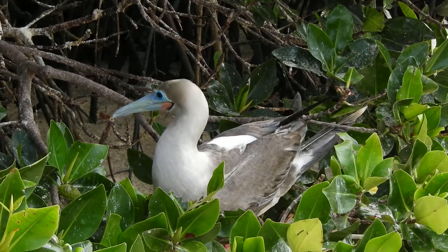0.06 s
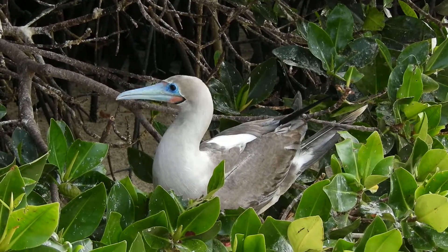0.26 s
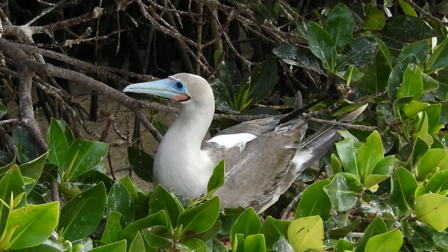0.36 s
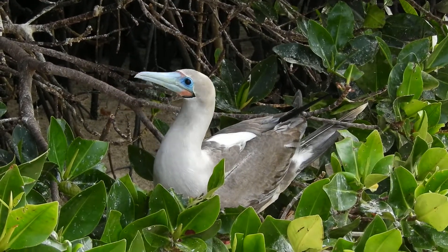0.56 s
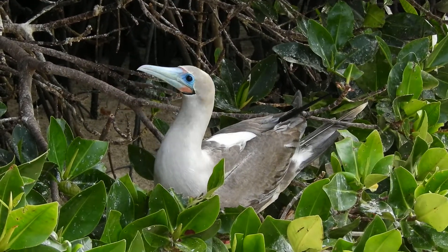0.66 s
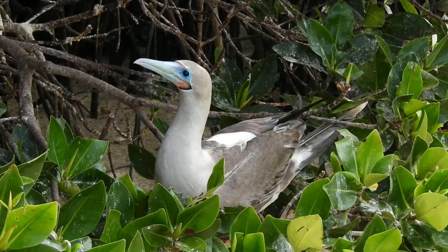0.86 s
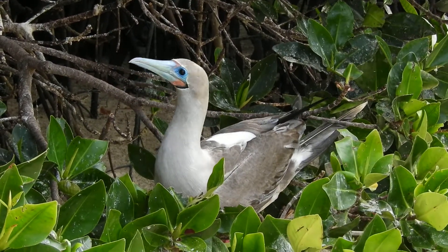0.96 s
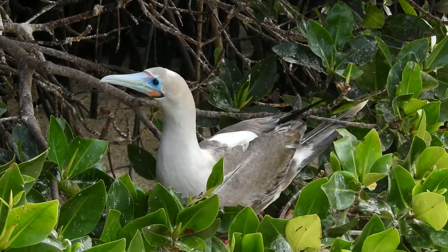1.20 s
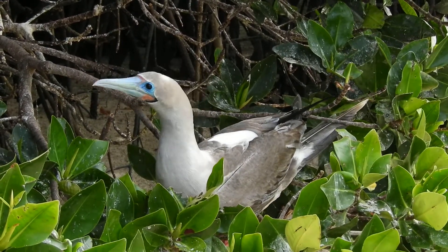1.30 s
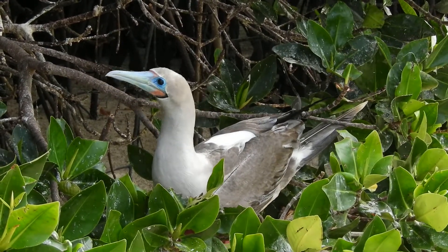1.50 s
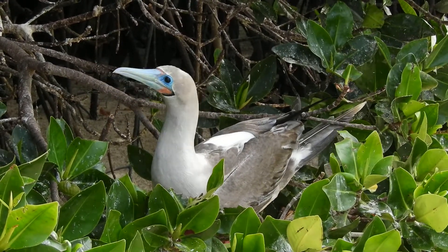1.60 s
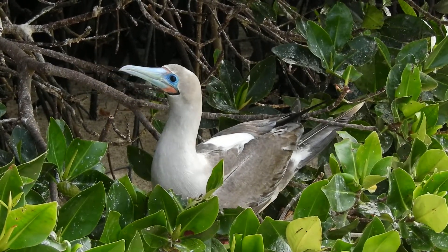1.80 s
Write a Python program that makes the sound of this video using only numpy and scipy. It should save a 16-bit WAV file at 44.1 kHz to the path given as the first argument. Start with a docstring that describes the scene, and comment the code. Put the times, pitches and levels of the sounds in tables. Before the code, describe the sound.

A seabird gives one harsh honk over wind rumble and camera shutter clicks.

```python
"""A soft rush of leaves and distant shore lies under a lumpy wind rumble from the start.
Small mechanical clacks and clicks, like camera shutters, sound nearby throughout. Wind thumps the right
microphone port around a faint far call; the hardest thump ducks the recorder's gain, which creeps back.
At 1.37 s a booby on its nest in the bushes gives one harsh honk from syrinx and throat: a rasping start,
a clearer arched note, a rough end. A second far call slips in among the last clacks."""
import sys
import numpy as np
from scipy import signal
from scipy.fft import rfft, irfft, next_fast_len
from scipy.io import wavfile
from scipy.ndimage import uniform_filter1d, map_coordinates

SR = 44100
rng = np.random.default_rng(int(sys.argv[2]) if len(sys.argv) > 2 else 0)


def output_pcm(signal):
    """Save a mono or channel-first signal as 16-bit PCM at the path in sys.argv[1].

    Samples are clipped to [-1, 1] before scaling.
    """
    pcm = np.clip(np.atleast_2d(signal).T, -1, 1) * 32767
    wavfile.write(sys.argv[1], SR, np.round(pcm).astype(np.int16))


N = 81585

# swells of the wind rumble: t/s, level/dB
RUMBLE_LEVEL = [(0, -26), (.11, -42), (.16, -28), (.28, -33.5), (.4, -24.5), (.52, -29), (.62, -33.5),
                (.76, -42.5), (.86, -39.5), (.94, -43.5), (1.02, -29), (1.17, -49), (1.28, -33),
                (1.35, -43), (1.45, -39.5), (1.6, -41.5), (1.85, -44)]
# tone of the rumble: f/Hz, level/dB
RUMBLE_COLOUR = [(15, 2), (35, -5.5), (70, 4), (110, -3.5), (170, -9), (250, -27), (400, -30.5),
                 (1000, -61)]
# wind thumps on the right port: t/s, half length/s, f/Hz, peak level/dB
THUMPS = [(.208, 0.01, 135, -10), (.252, 0.02, 120, -23.5), (.288, 0.014, 157, -13.5),
          (.313, 0.017, 120, -14.5), (.3425, 0.0096, 143.4, -4.5), (0.3608, 0.0082, 152, 1.5),
          (.933, 0.0051, 165, -19), (1.281, 0.0035, 95, -19.5), (1.309, 0.0032, 123, -13),
          (1.432, 0.015, 72.4, -26)]
# faders of the background bed: t/s, shore level/dB, leaves level/dB
RUSH_LEVEL = [(0, -45.5, -54.5), (.17, -45, -54), (.26, -38.5, -51), (.35, -42.5, -51), (.45, -41, -52),
              (.66, -45.5, -53), (.9, -43.5, -52.5), (1.06, -45.5, -53), (1.16, -43.5, -49.5),
              (1.35, -42.5, -55), (1.7, -44, -51), (1.81, -39, -52.5), (1.85, -42, -50)]
# dark wash of the shore: f/Hz, level/dB
SHORE_COLOUR = [(120, 9.5), (280, 1), (480, -5.5), (650, -6.5), (900, 0.5), (1100, -3.5), (1320, -1.5),
                (1600, -10), (2200, -13.5), (3200, -35.5), (8000, -89)]
# airy hiss of the leaves: f/Hz, level/dB
LEAVES_COLOUR = [(800, -39), (2000, -2), (3200, -2.5), (4400, 0.5), (5800, -2), (8000, -5.5),
                 (10000, -10.5), (12000, -16), (15500, -21)]

# cues of the dull clacks: t/s, level/dB
CLACKS = [(.047, -41), (.382, -33.5), (.7495, -27.5), (.841, -38.5), (1.111, -29.5), (1.473, -26.5),
          (1.844, -30)]
# hollow ring of a clack: f/Hz, level/dB, t60/s
CLACK_MODES = [(425, -8, .05), (570, -5, .045), (705, -1, .05), (830, -1, .045), (965, 0, .055),
               (1600, -13, .04), (2400, -19, .05)]
# rattle of a clack: f/Hz, level/dB
RATTLE_COLOUR = [(200, 1), (420, -2), (600, 0), (920, 8), (1200, -17), (1600, 2), (2000, -12), (2600, -8),
                 (4100, -13), (5200, -42.5), (8000, -21.5), (13000, -39)]
# short scrape after each clack: f/Hz, level/dB
SCRAPE_COLOUR = [(2500, -33), (3500, -12), (3850, -6), (4300, 3), (4700, -17), (6000, -28), (12000, -45)]
# cues of the two-part clicks: t/s, click level/dB, closing tick level/dB
CLICKS = [(0.213, -31.5, -35.5), (0.5017, -27, -32.5), (0.9298, -30.5, -35), (1.775, -44, -36.5)]
# body of a click: f/Hz, level/dB
CLICK_COLOUR = [(200, 8), (450, -6), (620, -1), (850, -4.5), (1080, 12), (1350, -31), (1830, 9),
                (2200, -15.5), (2750, 3), (3350, -6.5), (4000, -12), (5000, -40), (12000, -51)]
# its bright closing tick: f/Hz, level/dB
TICK_COLOUR = [(2500, -37.5), (3500, 4), (4200, 4), (5200, -6), (6700, 8), (8000, -1.5), (10000, -10.5),
               (13000, -35)]

# far calls, perhaps other birds: t/s, half length/s, f/Hz, width/Hz, level/dB
FAR_CALLS = [(0.269, 0.064, 1320, 130, -46), (1.81, 0.037, 875, 220, -42)]

# pitch arch of the honk: t/s, f/Hz
HONK_PITCH = [(1.37, 571.5), (1.402, 590.3), (1.43, 619), (1.456, 650), (1.478, 640.5), (1.495, 659.7),
              (1.522, 664.6), (1.56, 640), (1.584, 619.8), (1.625, 579)]
# the bird's effort: t/s, level/dB, roughness (0 clear, 1 and up all rasp)
HONK_EFFORT = [(1.368, -56, 0.98), (1.405, -33, 0.97), (1.43, -33.5, 1.1), (1.447, -28.5, 0.74),
               (1.473, -26.5, 0.26), (1.5, -22, .16), (1.535, -25.5, 0.2), (1.578, -22.5, 0.24),
               (1.595, -27.5, 0.58), (1.615, -31, .5), (1.627, -48, 0.8)]
# resonances of throat and bill: f/Hz, level/dB
THROAT_COLOUR = [(650, -46), (950, -18), (1230, -9.5), (1550, -8.5), (1930, -5.5), (2150, -6), (2520, 4.5),
                 (2950, -3.5), (3300, -9), (3800, -8), (4480, 7), (4900, -5.5), (5400, 5.5), (5950, -2),
                 (6300, 3), (7100, -4), (8000, -3.5), (9200, -18.5), (10400, -18.5), (12000, -53),
                 (15000, -63)]
# moving EQ of the honk: t/s, low gain/dB, flare gain/dB, high gain/dB
HONK_EQ = [(1.378, 17, -6, -3), (1.408, 10, -9, -13), (1.428, 16.5, 8.5, 4), (1.448, 10, 11.5, -3.5),
           (1.461, 14, -0.5, -0.5), (1.474, 6, 3, 6), (1.49, -3, -5.5, -1), (1.535, -2.5, 3, -2),
           (1.562, -3, 5, -2), (1.573, -13, -3, 0), (1.585, 0.5, 2.5, 0.5), (1.625, -8, -7, -8)]
# the bird's stereo placement: f/Hz, left minus right level/dB
BIRD_SIDE = [(1250, -7.5), (1950, -9.5), (2550, -9.5), (3200, 0), (4500, 4), (5400, 4), (6500, 10),
             (7400, 16), (8600, 3), (10000, 10)]
# how far the honk lags at the left port: f/Hz, phase/rad
PORT_LAG = [(1000, 0.5), (2600, -0.6), (4500, 1.94), (5900, 0.64), (6500, 1.94), (7400, 2), (9000, 5)]


def amp(db):
    return 10 ** (np.asarray(db) / 20)


def unit(x):
    return x / np.sqrt(np.mean(x ** 2) + 1e-20)


def clock():
    return np.arange(N) / SR


def along(points, hz):
    """Read (f/Hz, value) points on a log frequency axis."""
    f, values = np.transpose(points)
    return np.interp(np.log(hz + 1), np.log(f + 1), values)


def curves(rows):
    """An automation curve for each column after the time."""
    times, *columns = np.transpose(rows)
    return [np.interp(clock(), times, column) for column in columns]


def wobble(rate):
    """A smooth random curve at rms 1, with rate knots a second."""
    return unit(map_coordinates(rng.standard_normal(N // 8), [clock() * rate], mode="wrap"))


def filtered(x, response):
    """Apply a frequency response."""
    size = next_fast_len(N + SR // 2)
    return irfft(rfft(x, size) * response(np.fft.rfftfreq(size, 1 / SR)), size)[..., :N]


def coloured(x, colour):
    """EQ by (f/Hz, level/dB) points, then set to rms 1."""
    return unit(filtered(x, lambda hz: amp(along(colour, hz))))


def noise(colour):
    return coloured(rng.standard_normal(N), colour)


def pan(side_db):
    """Constant-power gains, left side_db above right."""
    gains = amp(np.array([[.5], [-.5]]) * side_db)
    return gains / np.sqrt(np.mean(gains ** 2, axis=0))


def wide(colour, shared):
    """Stereo noise with a fraction of its power shared by both sides."""
    centre = np.sqrt(shared) * noise(colour)
    return centre + np.sqrt(1 - shared) * np.array([noise(colour), noise(colour)])


def burst(start, db, t60, rise):
    """The envelope of one contact; times in seconds."""
    age = np.maximum(clock() - start, 0)
    return amp(db - 60 * age / t60) * (1 - np.exp(-age / rise))


def bushes(x, wet_db, t60=.2, predelay_s=.0088):
    """The sound plus its short stereo scatter from branches and ground."""
    t = clock()[:SR // 2]
    tail = rng.standard_normal((2, len(t))) * amp(-60 * t / t60) * (t > predelay_s)
    return x + amp(wet_db) * signal.fftconvolve(x[None], tail / np.linalg.norm(tail[0]), axes=1)[:, :N]


def wind(swing_db=1.8, wander=.069, left_leak_db=-56):
    """Wind on the microphone: a lumpy rumble on both ports and short low thumps on the right one."""
    level_db, = curves(RUMBLE_LEVEL)
    rumble = pan(-4.5) * wide(RUMBLE_COLOUR, shared=0) * amp(level_db + swing_db * wobble(21.94))
    thumps = np.zeros(N)
    for peak_s, half_length, hz, db in THUMPS:
        t = clock() - peak_s
        swell = amp(db) * np.exp(-(t / half_length) ** 2)
        thumps += swell * np.cos(2 * np.pi * hz * t * (1 + wander * wobble(90)))
    return rumble + thumps * np.array([[amp(left_leak_db)], [1]])


def rush():
    """The bed: distant shore near the centre and leaves spread wide, each slightly unsteady."""
    shore_db, leaves_db = curves(RUSH_LEVEL)
    shore = pan(1) * wide(SHORE_COLOUR, shared=.86) * amp(shore_db + .37 * wobble(29.3))
    leaves = pan(2.5) * wide(LEAVES_COLOUR, shared=.17) * amp(leaves_db + 1.13 * wobble(45.15))
    return shore + leaves


def clacks(rebound_s=.0081, rebound_db=-5, scrape_lag_s=.0075):
    """Dull contacts that ring hollow and rattle, rebound once and trail off in a scrape."""
    ring, rattle, scrape = np.zeros((3, N))
    for start, db in CLACKS:
        for hz, mode_db, t60 in CLACK_MODES:
            decay = burst(start, db + mode_db - 2 + rng.normal(0, 3.4), t60, rise=.00041)
            ring += decay * np.sin(2 * np.pi * hz * (clock() - start))
        rattle += burst(start, db - 4, t60=.033, rise=.00061)
        scrape += burst(start + scrape_lag_s, db - 16, t60=.1, rise=.0045)
    strike = np.array([ring, rattle])
    rebound = filtered(strike, lambda f: np.exp(-2j * np.pi * f * rebound_s))
    ring, rattle = strike + amp(rebound_db) * rebound
    return ring + rattle * noise(RATTLE_COLOUR) + scrape * noise(SCRAPE_COLOUR)


def clicks(tick_lag_s=.011):
    """Shutter-like contacts that open with a crack and close with a bright tick."""
    body, crack, tick = np.zeros((3, N))
    for start, db, tick_db in CLICKS:
        body += burst(start, db, t60=.05, rise=.00021)
        crack += burst(start, db - 3.5, t60=.0055, rise=.00029)
        tick += burst(start + tick_lag_s, tick_db, t60=.056, rise=.0036)
    return (body + crack) * noise(CLICK_COLOUR) + tick * noise(TICK_COLOUR)


def far_calls():
    """Faint calls from far away, each a swell of narrow-band noise."""
    calls = np.zeros(N)
    for peak_s, half_length, hz, width, db in FAR_CALLS:
        swell = amp(db) * np.exp(-((clock() - peak_s) / half_length) ** 2)
        phase = 2 * np.pi * hz * clock()
        calls += swell * (wobble(width) * np.sin(phase) + wobble(width) * np.cos(phase))
    return calls


def syrinx(rough, jitter=.0169, rasp_hz=190, flicker_db=1.3):
    """The bird's buzz and its phase: roughness shakes the pitch and smears harmonics into rasp."""
    hz, = curves(HONK_PITCH)
    phase = 2 * np.pi * np.cumsum(hz * (1 + jitter * rough * wobble(345.9))) / SR
    buzz = np.zeros(N)
    for k in range(1, 21):
        rasp = (wobble(rasp_hz) * np.sin(k * phase) + wobble(rasp_hz) * np.cos(k * phase)) / np.sqrt(2)
        clear = np.cos(k * phase + rng.normal()) * amp(flicker_db * wobble(70))
        smear = np.minimum(rough * (k / 8) ** .3, 1)  # upper harmonics smear more
        buzz += np.sqrt(1 - smear ** 2) * clear + smear * rasp
    return buzz, phase


def honk(hiss_db=-10.5, shimmer_db=.5):
    """Buzz and pulsed hiss pass through the throat, shifting in brightness as the call goes on."""
    level_db, rough = curves(HONK_EFFORT)
    rough = np.clip(rough, 0, 1)
    buzz, phase = syrinx(rough)
    hiss = coloured(rng.standard_normal(N) * (1 + np.cos(phase)), THROAT_COLOUR)
    voice = coloured(buzz, THROAT_COLOUR) + amp(hiss_db) * np.sqrt(2 * rough) * hiss
    bands = [lambda f: 1 / (1 + (f / 1800) ** 10),  # low
             lambda f: 1 / (1 + ((f - 6500) / 650) ** 4),  # flare
             lambda f: 1 - 1 / (1 + (f / 3500) ** 10)]  # high
    for band, band_db in zip(bands, curves(HONK_EQ)):
        voice += (amp(band_db) - 1) * filtered(voice, band)
    sounding = (clock() > HONK_EFFORT[0][0]) & (clock() < HONK_EFFORT[-1][0])
    gate = uniform_filter1d(sounding.astype(float), size=200)
    return voice * gate * amp(level_db + shimmer_db * rough * wobble(220))


def bird_placement(hz):
    """The honk reaches the two ports with a different level and phase at each frequency."""
    lag = np.array([[-.5], [.5]]) * along(PORT_LAG, hz)
    return pan(along(BIRD_SIDE, hz)) * np.exp(1j * lag)


def scene():
    """The mix: shutters to the left and the bird, both in the bushes, over wind, bed and far calls."""
    shutters = pan(5.5) * bushes(clacks() + clicks(), wet_db=-7)
    bird = filtered(bushes(honk(), wet_db=-10), bird_placement)
    return wind() + rush() + shutters + far_calls() + bird


def record(dry, ceiling=.99, depth_db=6, attack_s=.00046, recover_db_per_s=7, top_hz=15720):
    """An overload ducks the gain fast and it creeps back; peaks clip and the very top is cut."""
    overload = np.abs(dry).max(axis=0) > ceiling
    recovery_db = recover_db_per_s * clock()
    target_db = np.maximum.accumulate(depth_db * overload + recovery_db) - recovery_db
    pole = np.exp(-1 / (attack_s * SR))
    eased_db = signal.lfilter([1 - pole], [1, -pole], target_db)
    duck_db = .088 * target_db + .912 * eased_db  # a small part lands as a step
    fade_in = np.minimum(clock() / .003, 1)
    clipped = np.clip(dry * fade_in * amp(-duck_db), -ceiling, ceiling)
    return filtered(clipped, lambda hz: hz < top_hz)


dry = scene()
out = record(dry)
output_pcm(out)
```